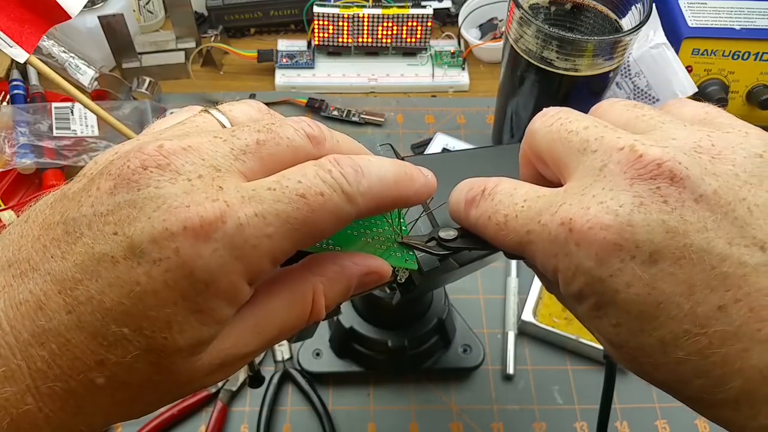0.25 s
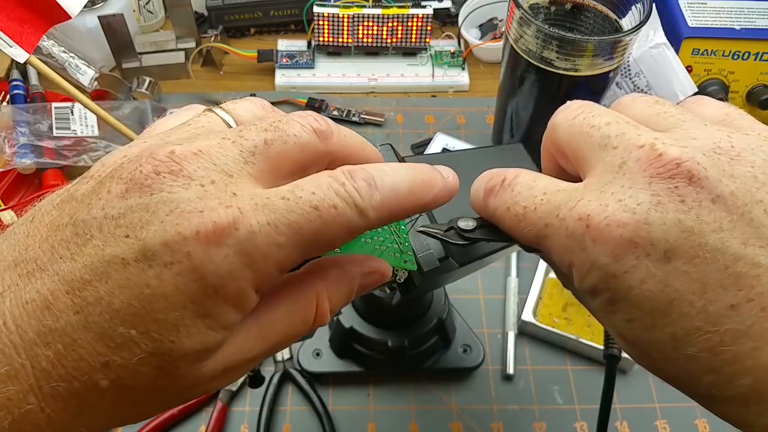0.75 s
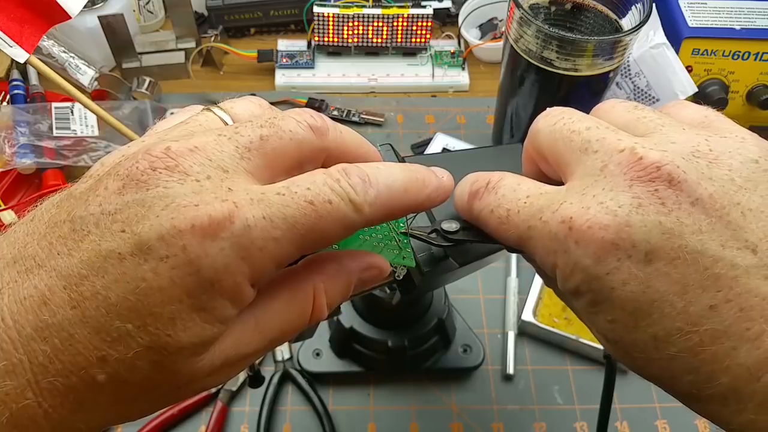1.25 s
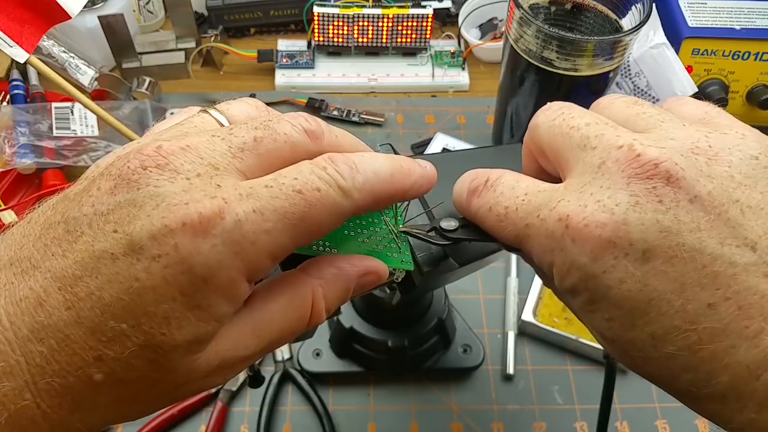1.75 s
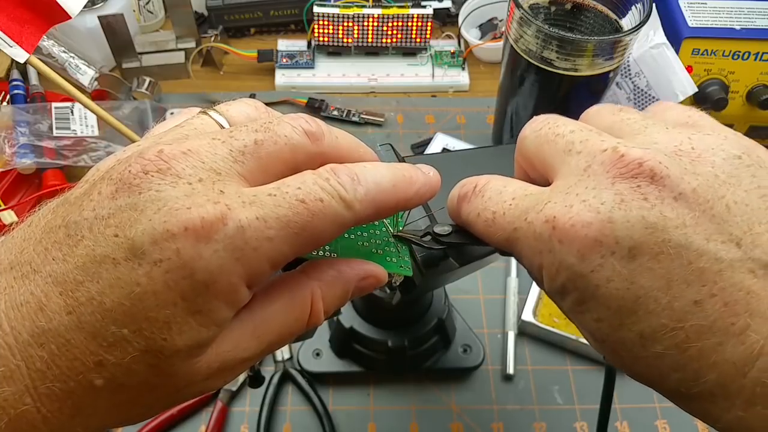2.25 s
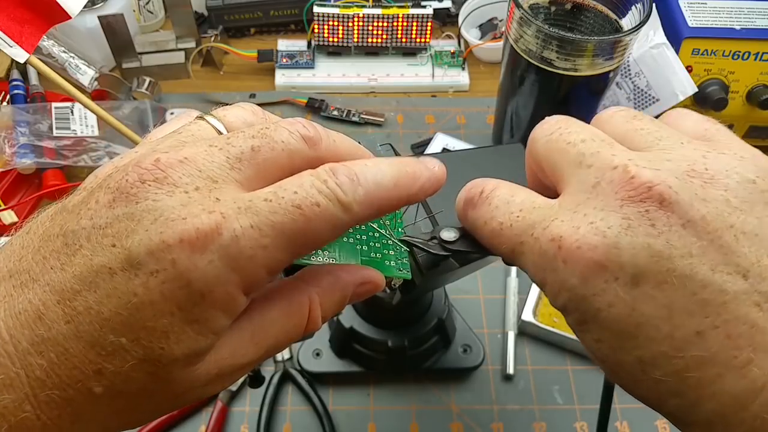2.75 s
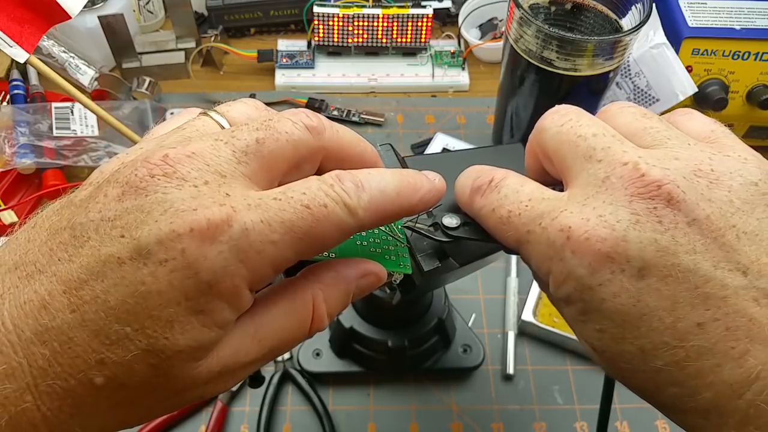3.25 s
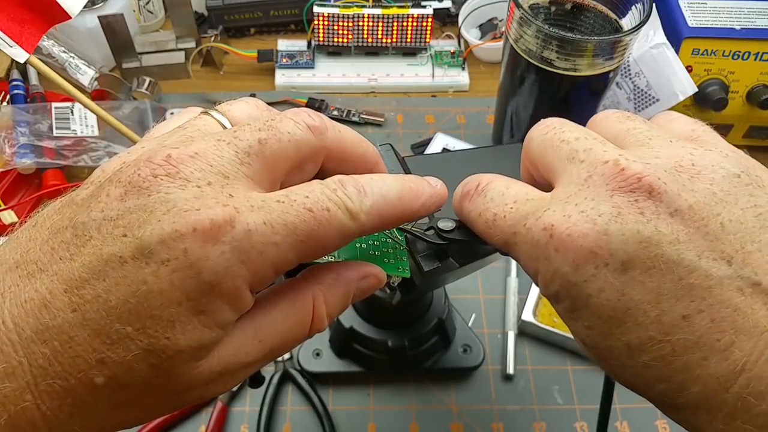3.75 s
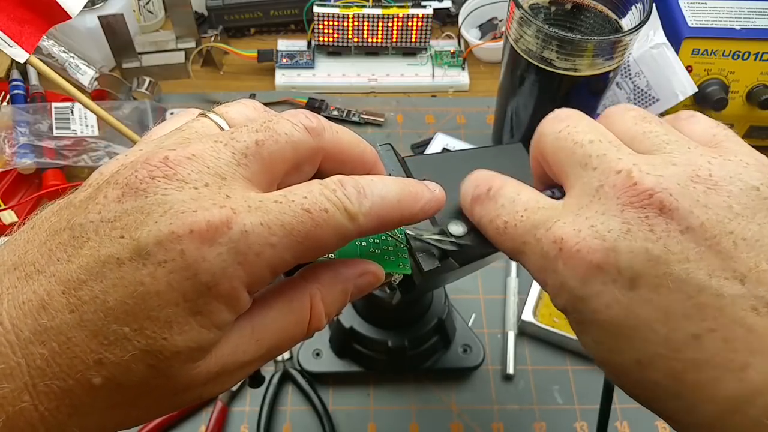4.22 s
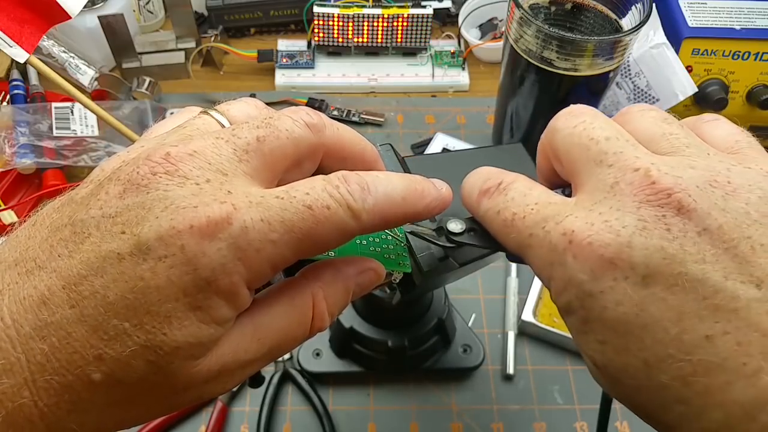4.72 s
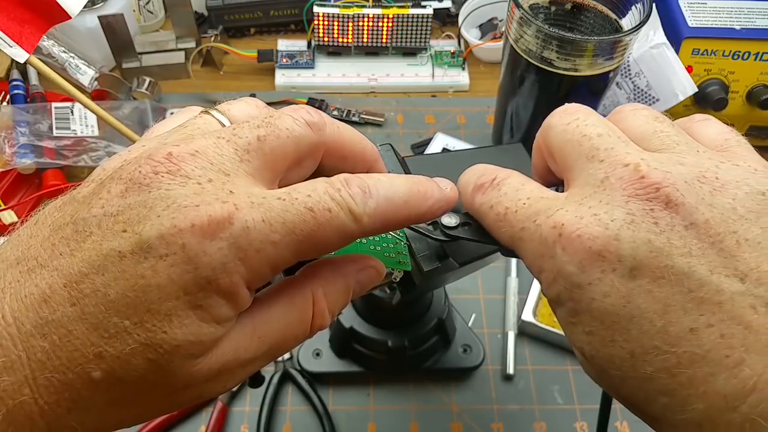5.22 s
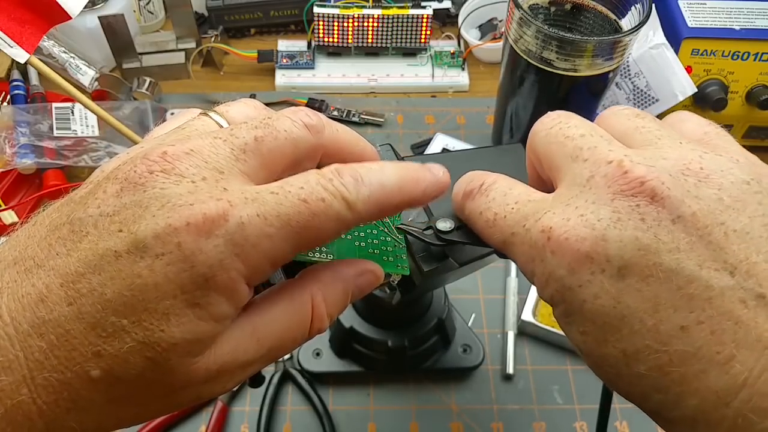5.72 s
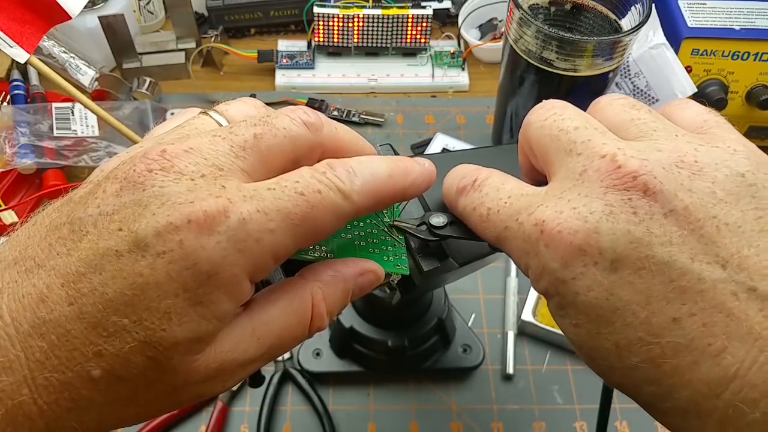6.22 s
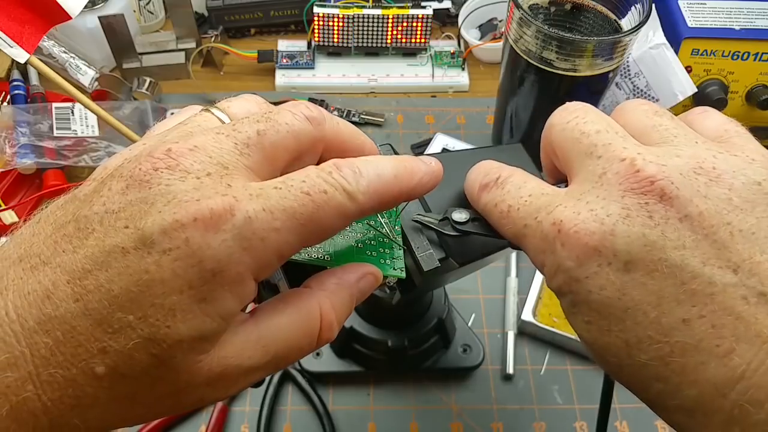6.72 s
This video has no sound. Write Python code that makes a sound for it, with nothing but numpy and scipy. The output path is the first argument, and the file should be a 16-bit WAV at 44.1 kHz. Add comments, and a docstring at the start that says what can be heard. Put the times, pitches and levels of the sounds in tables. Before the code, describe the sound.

A faint low hum and soft hiss fill a small, dry workroom throughout. Right at the start, the steel jaws of side cutters tick lightly against a wire lead on a clamped circuit board. Sharp, close snips follow at about 0.5, 1.5 and 2.7 seconds, each a short, bright crack with a slight ring from the jaws and board. These are the loudest sounds. From about 2.9 to 4.6 seconds the jaws tap and skid on the leads, and the board slips in its vice with small dull knocks, the clearest near 4.3 seconds. A fourth snip comes at about 5.6 seconds, then a knock and a few quick metal ticks around 6.2 seconds, and the last snip at about 6.4 seconds. Between the cuts, fingers softly bump and rub the board, and it creaks faintly in the clamp.

```python
"""Light ticks of steel on wire come first, over the low hum and soft hiss of a small, dry workroom.
Side cutters are snipping five leads off a circuit board held in a vice. Their jaws land on a lead one
after the other and sometimes skid on. Each lead parts with a crack that rings the jaws, board and vice,
and the board settles just after. Between cuts the board slips, catches and creaks in its clamp,
fingers bump and rub it, and loose bits ring briefly."""
import sys
import numpy as np
from scipy import signal
from scipy.fft import rfft, irfft, next_fast_len
from scipy.io import wavfile
from scipy.ndimage import map_coordinates

SR = 44100
rng = np.random.default_rng(int(sys.argv[2]) if len(sys.argv) > 2 else 0)


def transcribe(signal):
    """Save signal, clipped to [-1, 1], as a 16-bit WAV file at the path in sys.argv[1]."""
    frames = np.atleast_2d(signal).T
    limited = np.clip(frames, -1, 1)
    pcm = np.round(limited * 32767).astype(np.int16)
    wavfile.write(sys.argv[1], SR, pcm)


N = 307818
T = np.arange(2 ** 14) / SR  # seconds inside one hit
HZ = np.fft.rfftfreq(len(T), 1 / SR)  # frequencies inside one hit


def amp(db):
    """Turn dB into a gain."""
    return 10 ** (np.asarray(db) / 20)


def unit(x):
    """Scale to an average (rms) level of 1."""
    return x / np.sqrt(np.mean(x ** 2) + 1e-20)


def burst(x):
    """Scale to an energy of 1 in each channel."""
    return x / np.sqrt(np.sum(x ** 2, axis=-1, keepdims=True) + 1e-20)


def panned(db):
    """Gains that make the left side db louder than the right."""
    return amp([[db / 2], [-db / 2]])


def along(points, hz):
    """Read between (Hz, value) points on a log frequency scale."""
    freqs, values = np.transpose(points)
    return np.interp(np.log(hz + 1), np.log(freqs + 1), values)


def wobble(rate):
    """A smooth curve through rate random points a second."""
    return map_coordinates(rng.standard_normal(int(N * rate / SR) + 4), [np.arange(N) * rate / SR])


def filtered(x, response):
    """Scale each frequency of a whole track by response(hz)."""
    size = next_fast_len(N + SR // 2)
    return irfft(rfft(x, size) * response(np.fft.rfftfreq(size, 1 / SR)), size)[..., :N]


def coloured(x, gain_db):
    """Shape the tone of one hit so that nothing sounds before it starts."""
    cepstrum = irfft(np.log(amp(gain_db)))
    cepstrum[1:len(T) // 2] *= 2
    cepstrum[len(T) // 2 + 1:] = 0
    return irfft(rfft(x) * np.exp(rfft(cepstrum)))


def add(track, start, sound):
    """Mix a sound into the track at start seconds."""
    part = track[:, max(round(start * SR), 0):][:, :len(T)]
    part += sound[:, :part.shape[1]]


def pair(start, db, gap, second_db=6, fade_db_per_s=445.5):
    """Time and level of two touches, the harder at db; a longer gap weakens the second against the first."""
    extra_db = second_db - fade_db_per_s * gap
    return [(start, db - max(extra_db, 0)), (start + gap, db + min(extra_db, 0))]


def ring(notes, pitch=1, vary_db=3, apart_hz=4000):
    """A struck part rings its notes at random strengths; high ones reach left and right out of step."""
    hz, db, t60 = np.transpose(notes)[:, :, None]  # t60, the ring time: seconds to fade by 60 dB
    phase = rng.normal(0, 1, (2, len(hz), 1)) * np.minimum(hz / apart_hz, 1)
    size = amp(db + vary_db * rng.standard_normal(hz.shape)) / np.sqrt(t60)
    waves = np.sin(2 * np.pi * pitch * hz * T + phase)
    return burst(np.sum(size * amp(-60 * T / t60) * waves, axis=1))


def contact(colour_db, scatter_db, t60, apart_hz=2500, smear_hz=4000):
    """A sharp pulse, then its dense scatter off hands, board and bench."""
    mid, side = rng.standard_normal((2, len(T)))
    side = irfft(rfft(side) * HZ / np.hypot(HZ, apart_hz))  # both sides share the bass
    scatter = burst(np.array([mid + side, mid - side]) * amp(-60 * T / t60))
    click = np.eye(2, len(T), 2)  # reaches the right side one sample later
    # bending waves bring the treble first
    pulse = irfft(rfft(click) * (smear_hz - 1j * HZ) / (smear_hz + 1j * HZ))
    return burst(coloured(pulse + amp(scatter_db) * scatter, colour_db))


# The room's echo. Each row: frequency in Hz, ring time in seconds.
ROOM_ECHO = [(200, 0.4), (1500, 0.14), (5000, 0.16), (15000, 0.15)]
def in_room(hit, wet_db, build_s=0.0013):
    """The hit plus a room echo whose frequencies die away at their own speeds."""
    hz, t, noise = signal.stft(rng.standard_normal((2, len(T))), SR, nperseg=256)
    fade = amp(-60 * t / along(ROOM_ECHO, hz)[:, None])
    tail = signal.istft(noise * fade, SR, nperseg=256)[1][:, :len(T)]
    tail = burst(tail * (1 - np.exp(-(T / build_s) ** 2)))
    return hit + amp(wet_db) * signal.fftconvolve(hit, tail, axes=1)[:, :len(T)]


# How alike left and right are. Each row: frequency in Hz, likeness (1 means the same).
LIKENESS = [(60, 1), (130, 0.96), (290, 0.78), (640, 0.37), (1400, -0.24), (5000, 0.00052)]
def room_noise(tone):
    """Steady noise with the given tone, nearly the same on both sides in the bass."""
    def response(hz):
        angle = np.arccos(np.clip(along(LIKENESS, hz), -1, 1)) / 2
        return amp(along(tone, hz)) * [np.cos(angle), np.sin(angle)]
    mid, side = filtered(rng.standard_normal((2, N)), response)
    return unit(np.array([mid + side, mid - side]))


# The tone of the rumble and of the hiss. Each row: frequency in Hz, relative level in dB.
RUMBLE_TONE = [(15, -9), (30, -3), (42, -1.5), (52, -7), (80, 0), (105, 1.5), (145, -3), (180, -16),
               (205, -16.5), (245, -10), (290, -12.5), (335, -11.5), (550, -26), (1500, -49.5)]
HISS_TONE = [(100, -12.5), (400, -2), (800, 0), (1300, -4), (2000, -6), (3900, -12.5), (5000, -6),
             (6000, -12), (7600, -20.5), (11500, -17.5), (15700, -20), (16300, -42)]
# The rumble's slow drift. Each row: time in seconds, average level in dB.
RUMBLE_DRIFT = [(0, -52.5), (0.45, -56), (0.6, -54), (2, -53), (6.98, -51)]
# The hum. Each row: pitch in Hz, average level in dB.
HUM_NOTES = [(118.4, -68.5), (242.2, -68.5)]
def background(swell_db=1.35, hiss_db=-64):
    """Room rumble that swells unevenly, a wavering hum and a soft hiss."""
    t = np.arange(N) / SR
    hum = sum(amp(db) * np.sqrt(2) * np.sin(2 * np.pi * hz * t + wobble(4.2)) for hz, db in HUM_NOTES)
    rumble_db = np.interp(t, *np.transpose(RUMBLE_DRIFT)) + swell_db * wobble(10)
    return amp(rumble_db) * room_noise(RUMBLE_TONE) + hum + amp(hiss_db) * room_noise(HISS_TONE)


# The tone of a tick. Each row: frequency in Hz, relative level in dB.
TICK_TONE = [(100, -13), (700, -14), (1500, -13), (2800, -6), (4500, -2), (6500, -5), (8300, -12.5),
             (11000, -9), (16000, -20.5)]
# The ringing jaws. Each row: pitch in Hz, relative level in dB, ring time in seconds.
JAW_NOTES = [(2038, 2.5, 0.075), (2195, -1, 0.099), (2563, -3, 0.1), (3116, 9, 0.032), (3170, -11, 0.024),
             (4255, -5.5, .02), (5020, -1.5, 0.1), (5930, -1.5, 0.043), (7290, 5, 0.034),
             (7315, 0.5, 0.036)]
def tick(treble_db):
    """One light, bright touch of steel on a lead rings the jaws."""
    treble = np.clip(np.log2((HZ + 1) / 5000), 0, 1)  # rises from 5 to 10 kHz
    touch = contact(along(TICK_TONE, HZ) + treble_db * treble, scatter_db=10, t60=.031)
    return in_room(touch + amp(-12) * ring(JAW_NOTES), wet_db=-8)


# Jaws landing. Each row: start in seconds, level in dB, wait for the second jaw in seconds,
# extra treble in dB, left over right in dB, number of skid ticks.
JAW_TAPS = [(0.038, -18.5, .0028, -5.5, -0.5, 0), (0.170, -22.5, .0272, -2, -2, 2),
            (2.8604, -26.5, .023, 2, -2, 0), (3.0619, -20, 0.0044, -3, -3, 1),
            (4.341, -28, .02, 8.5, -3, 0), (4.630, -17.5, .003, -3, -3.5, 3),
            (5.837, -33, 0.0075, -18, -2, 0), (6.1512, -20, .0112, -9.5, -0.5, 0),
            (6.244, -22.5, .005, -0.5, -5, 0)]
def jaw_taps(skid_after_s=.072, skid_step_s=.038, uneven_s=.0022, skid_db=-36):
    """The two jaws land on a lead in turn, and sometimes skid over its neighbours with faint ticks."""
    out = np.zeros((2, N))
    for start, db, gap, treble_db, pan_db, skids in JAW_TAPS:
        for when, level in pair(start, db, gap):
            add(out, when, panned(pan_db) * amp(level) * tick(treble_db))
        for k in range(round(skids)):
            when = start + gap + skid_after_s + k * skid_step_s + uneven_s * rng.uniform(-1.1, 1)
            add(out, when, amp(skid_db) * tick(treble_db=-2))
    return out


# The tone of a knock. Each row: frequency in Hz, relative level in dB.
KNOCK_TONE = [(100, -20), (700, -12), (1300, 4.5), (2100, -5), (3500, -10), (5500, -17), (8000, -28),
              (16000, -26.5)]
# The ringing board and vice. Each row: pitch in Hz, relative level in dB, ring time in seconds.
BOARD_NOTES = [(847, -12.5, 0.1), (1124, -15.5, 0.04), (1483, -2.5, 0.0394), (1418, 5, 0.055),
               (2124, -10.5, 0.035), (3264, -12.5, 0.045)]
VICE_NOTES = [(299, 1, 0.07), (405, -2.5, 0.029), (461.6, 1, 0.075)]
def knock(pitch, thud_db, board_db=-1):
    """One dull knock of the board in its clamp; a tighter grip raises its pitch."""
    slip = contact(along(KNOCK_TONE, HZ), scatter_db=9.5, t60=0.045)
    body = amp(board_db) * ring(BOARD_NOTES, pitch) + amp(thud_db) * ring(VICE_NOTES)
    return panned(-1.705) * in_room(amp(-2) * slip + body, wet_db=-12.5)


# The board slipping. Each row: start in seconds, level in dB, wait for the catch in seconds,
# board pitch factor, vice thud in relative dB.
BOARD_SLIPS = [(0.243, -36, .002, 1.22, -14), (1.0497, -24.5, .0007, 0.93, -10),
               (2.456, -33.5, .013, 1.31, 8), (2.525, -31.5, .002, 1.25, 8), (2.8591, -28, .023, 1.2, 2),
               (3.730, -36, .0007, 1.0, 4), (4.112, -35, 0.00073, 0.85, -2), (4.232, -31.5, .0005, 1.4, -5),
               (4.278, -33, 0.00081, .97, -12), (4.3411, -21, 0.002095, .98, 3),
               (5.015, -34.5, 0.00198, .93, 0.5), (5.584, -35, 0.00062, 0.95, -6.5),
               (5.837, -26, 0.0074, .96, -6), (6.207, -32, .007, 0.9, -14),
               (6.317, -35.5, 0.00207, 0.9, -1)]
def board_slips():
    """Pressed by the fingers, the board slips and catches again: two knocks."""
    out = np.zeros((2, N))
    for start, db, gap, pitch, thud_db in BOARD_SLIPS:
        for when, level in pair(start, db, gap):
            add(out, when, amp(level) * knock(pitch, thud_db))
    return out


def finger_bumps(count=25, softest_db=-42, range_db=9.5, pad_db=-9):
    """The hands keep shifting their hold: tiny soft bumps on board and vice."""
    out = np.zeros((2, N))
    for place, size, grip in rng.random((count, 3)):
        pad = contact(along(KNOCK_TONE, HZ), scatter_db=19, t60=0.065)
        vice = ring(VICE_NOTES, pitch=.8 + grip / 2)
        add(out, place * N / SR, amp(softest_db + range_db * size) * (vice + amp(pad_db) * pad))
    return out


# The cuts. Each row: start in seconds, level in dB, board ring in relative dB, board pitch factor,
# vice thud in relative dB, brightness in dB per octave, the lead's own pitch in Hz.
CUTS = [(0.5409, 5, -9.5, 0.97, -18.5, 2.5, 7200), (1.4837, 3.5, -12, 1.01, -17, 1.5, 6900),
        (2.6923, 7, -21, 1.37, -27, 0.1, 3900), (5.6365, 3.5, -11, 1.0, -21, 1.06, 7200),
        (6.4492, 5.5, -10.5, 1.017, -18.5, 1.5, 5150)]
def creaks_and_settling(count=3, squeeze_s=.43, loudest_db=-39.5, settle_s=.102, settle_db=-36):
    """The board creaks faintly as the grip tightens before each cut, and settles with a knock after it."""
    out = np.zeros((2, N))
    for start, *_ in CUTS:
        for early, softness, grip in rng.random((count, 3)):
            creak = knock(pitch=1 + 0.078 * (2 * grip - 1), thud_db=4)
            add(out, start - squeeze_s * early, amp(loudest_db - 2 * softness) * creak)
        add(out, start + settle_s, amp(settle_db) * knock(pitch=0.91, thud_db=4))
    return out


# The tone of a lead parting. Each row: frequency in Hz, relative level in dB.
CRACK_TONE = [(60, -30.5), (280, -3), (520, -0.5), (700, -14), (900, -11.5), (1250, -1), (2000, 7),
              (2700, 1), (4200, 0), (7200, -1), (8200, -3.5), (13000, -6.5), (15500, -9), (17000, -34)]
def snips(lead_peak_db=4, lead_width_octaves=.13):
    """The lead gives way with a crack: the jaws slam shut and the board springs back."""
    out = np.zeros((2, N))
    octaves = np.log2(np.clip(HZ, 1000, None) / 4000)  # brightness tilts the tone around 4 kHz
    for start, db, board_db, pitch, thud_db, bright, lead_hz in CUTS:
        lead_db = lead_peak_db * np.exp(-(np.log2((HZ + 1) / lead_hz) / lead_width_octaves) ** 2)
        crack = contact(along(CRACK_TONE, HZ) + bright * octaves + lead_db, scatter_db=4.5, t60=.037)
        jaws = amp(-14) * ring(JAW_NOTES)
        board = amp(board_db) * ring(BOARD_NOTES, pitch)
        vice = amp(thud_db) * ring(VICE_NOTES)
        add(out, start, amp(db) * in_room(crack + jaws + board + vice, wet_db=-11))
    return out * panned(-2.4)


# Fingertips dragging. Each row: start in seconds, length in seconds, pitch in Hz, level in dB.
FINGER_RUBS = [(0.996, .03, 2800, -66.5), (1.295, 0.14, 645, -65.5), (2.237, 0.032, 1350, -66),
               (2.828, 0.086, 1400, -63), (5.826, 0.024, 2840, -55.5)]
def finger_rubs(width=0.084, uneven_db=4):
    """Skin sticks and slips on the board: a short swell of uneven grains around one pitch."""
    out = np.zeros((2, N))
    for start, length, hz, db in FINGER_RUBS:
        slips = rng.standard_normal(len(T)) * amp(uneven_db * rng.standard_normal(len(T)))
        damping = 1j * HZ * hz * width
        tone = unit(irfft(rfft(slips) * damping / (hz ** 2 - HZ ** 2 + damping)))
        stroke = amp(db) * tone * np.sin(np.pi * np.minimum(T / length, 1))
        add(out, start, in_room(np.array([stroke, stroke]), wet_db=-4.5))
    return out


# Loose bits. Each row: start in seconds, pitch in Hz, level in dB, ring time in seconds.
LOOSE_BITS = [(2.832, 833, -48.5, 0.15), (2.912, 5230, -57.5, 0.046), (6.249, 4840, -40, 0.033)]
def loose_bits(rise_s=0.00059):
    """Offcuts and other loose bits ring on one note each."""
    out = np.zeros((2, N))
    for start, hz, db, t60 in LOOSE_BITS:
        note = amp(db - 60 * T / t60) * np.sin(2 * np.pi * hz * T) * (1 - np.exp(-T / rise_s))
        add(out, start, in_room(np.array([note, note]), wet_db=-5))
    return out


def scene():
    """Cuts, handling noises and the room, added together."""
    cutters = snips() + jaw_taps()
    handling = board_slips() + creaks_and_settling() + finger_rubs() + finger_bumps()
    return cutters + handling + loose_bits() + background()


def record(dry, ceiling=.8, top_hz=16700):
    """The very highest peaks are softly rounded off, and nothing above top_hz is kept."""
    rounded = dry / (1 + (dry / ceiling) ** 4) ** .25
    return filtered(rounded, lambda hz: hz < top_hz)


dry = scene()
out = record(dry)
transcribe(out)
```